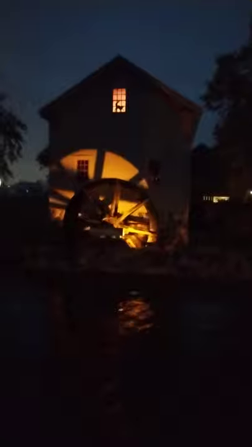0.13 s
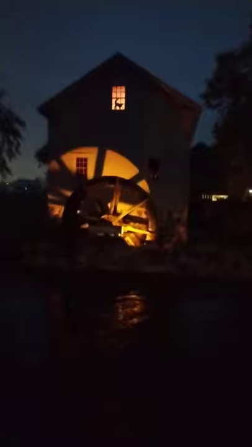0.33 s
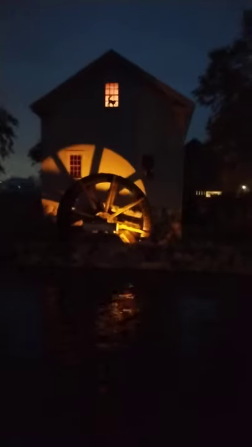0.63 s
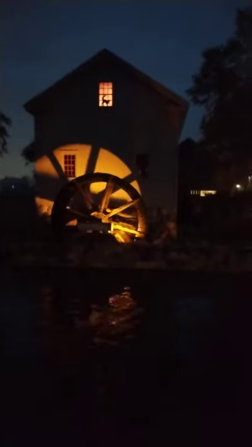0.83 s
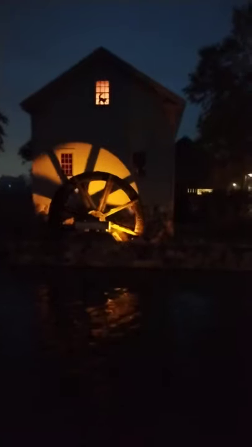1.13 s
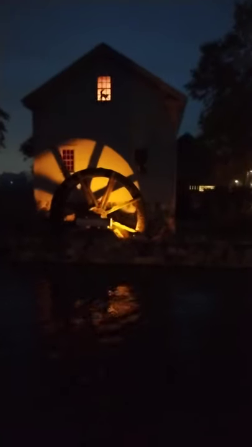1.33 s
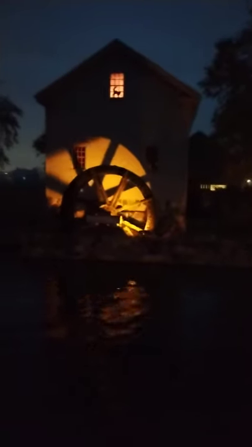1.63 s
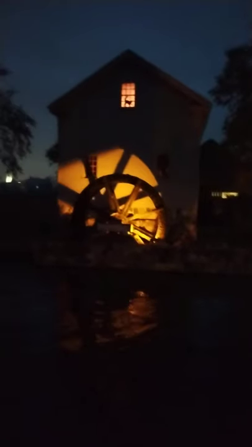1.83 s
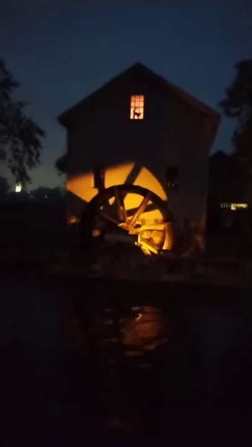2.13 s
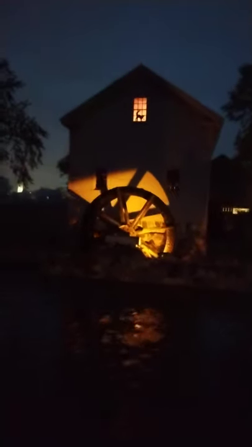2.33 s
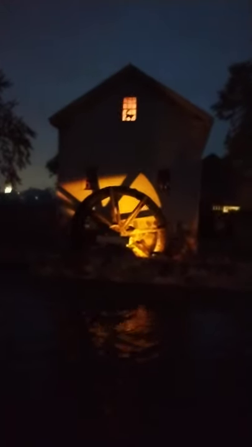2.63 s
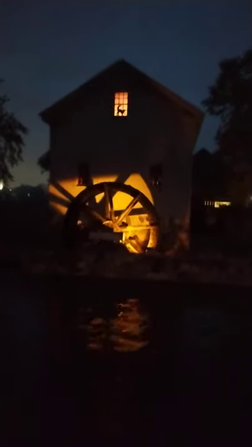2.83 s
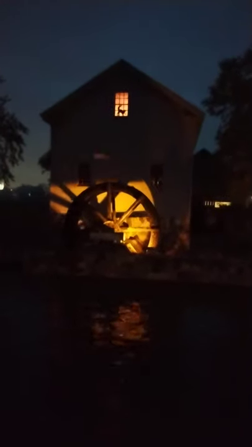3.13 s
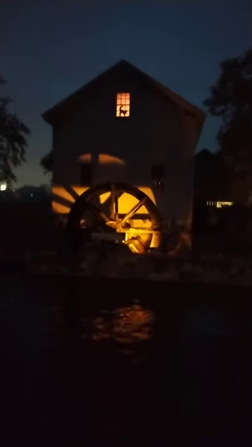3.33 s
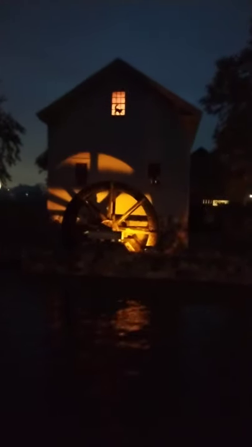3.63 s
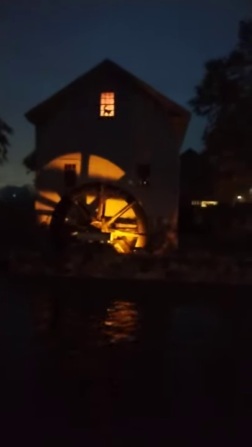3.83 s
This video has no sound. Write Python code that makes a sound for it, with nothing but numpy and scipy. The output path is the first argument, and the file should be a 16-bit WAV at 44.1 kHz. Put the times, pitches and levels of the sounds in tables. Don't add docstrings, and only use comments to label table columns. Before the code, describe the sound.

Rushing water at a mill wheel and weir, heard across a pond by a hand-held phone. Silence until 0.24 s, then a faint hiss swells to a full, steady roar by 0.5 s, with bright splashing spray and a low hollow boom. A deep plop sits near 0.7 s. From 2.1 to 3 s the flow weakens and wheel splashes thin out; a softer wash continues to 4 s, with tiny slaps near 2.6 and 3.8 s.

```python
import sys
import numpy as np
from scipy import signal
from scipy.fft import rfft, irfft
from scipy.io import wavfile

SR = 44100
rng = np.random.default_rng(int(sys.argv[2]) if len(sys.argv) > 2 else 0)


def bounce(signal):
    frames = np.transpose(np.atleast_2d(signal))
    limited = np.clip(frames, -1, 1)
    pcm = np.round(limited * 32767).astype(np.int16)
    wavfile.write(sys.argv[1], SR, pcm)


def voltage_ratio(level):
    return 10 ** (np.asarray(level, float) / 20)


N = 176400
OPENS_S, OPEN_RAMP_S = 0.2415, 0.0024


def table(rows, col, hz):
    rows = np.array(rows, float)
    return np.interp(np.log(hz + 1), np.log(rows[:, 0]), rows[:, col])


def walk(rate_hz):
    at = np.arange(N) * rate_hz / SR
    i = at.astype(int)
    part = at - i
    levels = rng.standard_normal(200)
    return 1.15 * (levels[i] + (levels[i + 1] - levels[i]) * part ** 2 * (3 - 2 * part))


def bursts(per_s, size_db):
    u = (2 * rng.random((2, N)) - 1) * SR / per_s
    born = abs(u) < 1
    size = (abs(u) + 1e-9) ** (-size_db * np.log(10) / 20)
    x = born * np.sign(u) * size
    return x / x.std()


def water(colour_db, ports, lo_hz, hi_hz, crowd, size_db, flicker_db, flicker_hz):
    hz = np.arange(N // 2 + 1) * SR / N
    thirds = 3 * np.log2(hz / lo_hz + 1e-9)
    parts = 0
    swell_db = 0.2 * walk(2.71)
    for k in range(int(3 * np.log2(hi_hz / lo_hz)) + 1):
        band = np.cos(np.pi / 2 * np.clip(thirds - k, -1, 1))
        per_s = min(crowd * lo_hz * 2 ** (k / 3), SR / 2)
        births = bursts(per_s, size_db)
        parts = parts + band * rfft(births * voltage_ratio(swell_db + flicker_db * walk(flicker_hz)))
    left, other = parts * voltage_ratio(colour_db(hz))
    like = np.clip(table(ports, 3, hz), 0, 1)
    shared = like * left * np.exp(-1j * table(ports, 2, hz))
    right = (shared + np.sqrt(1 - like ** 2) * other) * voltage_ratio(-table(ports, 1, hz))
    out = irfft(np.array([left, right]), N)
    return out / out[0].std()


def bump(hz, at_hz, width_hz, db):
    return db / (1 + (2 * (hz - at_hz) / width_hz) ** 2)


# frequency in Hz, density in dB per Hz.
ROAR_COLOUR = [(30, -30), (60, -10.5), (200, -4), (400, -6.5), (800, -13), (1400, -12), (2300, -23.5),
               (3400, -34)]
# frequency in Hz, left over right in dB, left lead in radians, likeness 0-1.
LOW_PORTS = [(150, .3, .1, .993), (430, 2.5, .3, .96), (740, -2.5, 0, .74), (950, -1, .6, .82),
             (1350, 3.5, 1.1, .66), (1850, 0, .35, .55), (2300, -1, 1.6, .3), (3000, 2, 2.7, .55)]


def roar():
    def colour_db(hz):
        return table(ROAR_COLOUR, 1, hz) + bump(hz, at_hz=2956, width_hz=590, db=6.5)
    return water(colour_db, LOW_PORTS, 25, 4200, crowd=2.5, size_db=2.0, flicker_db=0.5, flicker_hz=14)


# frequency in Hz, density in dB per Hz.
SPRAY_COLOUR = [(2500, -29), (4300, -12.5), (6800, -9), (7900, 1), (9600, -0.5), (12000, -13.5),
                (13500, -10), (15700, -11.5)]
# frequency in Hz, left over right in dB, left lead in radians, likeness 0-1.
HISS_PORTS = [(3000, 0.82, 6.1, 0.49), (4200, 2.9, 2.96, 0.69), (6550, 9.9, 6, 0.32), (8300, 15, 5.6, 0.56),
              (10000, 9.7, 5.9, 0.56), (11300, 0.83, 15, 0.27), (13000, 4.3, 3.6, .3), (16000, 3.8, 14, .3)]


def spray():
    return water(lambda hz: table(SPRAY_COLOUR, 1, hz), HISS_PORTS, 3250, 17000,
                 crowd=1.1, size_db=2.0, flicker_db=0.47, flicker_hz=15)


# frequency in Hz, density in dB per Hz.
SPILL_COLOUR = [(4800, -29), (6000, -7), (7200, -4), (8400, -0.5), (9600, -4), (11500, -23.5),
                (13500, -17.5), (15700, -17.5)]
# frequency in Hz, left over right in dB, left lead in radians, likeness 0-1.
WHEEL_PORTS = [(4480, 2.4, 3.1, 0.96), (6000, 7, 4, 1), (7200, 9.6, 3.9, 0.35), (8250, 15, 7.2, 0.31),
               (9600, 15, 4.3, 0.51), (10700, 4.6, 1.6, 0.56), (12000, 1, 2.6, .2), (14000, 5.5, 8, .2)]


def spill():
    return water(lambda hz: table(SPILL_COLOUR, 1, hz), WHEEL_PORTS, 4130, 17000,
                 crowd=0.99, size_db=1.5, flicker_db=1.3, flicker_hz=10.7)


# frequency in Hz, density in dB per Hz.
HOLLOW_COLOUR = [(50, -12), (75, -10.5), (100, -5), (120, 1), (140, -7), (180, -10.5), (260, -30)]


def hollow():
    return water(lambda hz: table(HOLLOW_COLOUR, 1, hz), LOW_PORTS, 60, 250,
                 crowd=3, size_db=1.0, flicker_db=-0.3, flicker_hz=7.2)


# frequency in Hz, density in dB per Hz.
STEADY_HISS_COLOUR = [(1800, -7), (3000, -2), (4300, 0), (5500, 1.5), (7000, 0), (9000, -1)]


def steady_hiss(t):
    level_db, settle_s = -57.5, 0.048
    hiss = water(lambda hz: table(STEADY_HISS_COLOUR, 1, hz), HISS_PORTS, 2460, 8500,
                 crowd=2.3, size_db=1.3, flicker_db=3.5, flicker_hz=5.5)
    since_open_s = np.clip(t - OPENS_S, 0, None)
    return hiss * voltage_ratio(level_db) * (1 - 0.2 * np.exp(-since_open_s / settle_s))


# start in seconds, pitch in Hz, level in dB, length in seconds.
PLOP_EVENTS = [
    (0.6925, 139, -28, 0.0057),
    (2.64, 2055, -49.5, 0.01),
    (3.76, 1650, -46, 0.0078),
]


def plops(t):
    out = np.zeros(N)
    for start_s, hz, db, length_s in PLOP_EVENTS:
        u = np.clip(t - start_s, 0, None) / length_s
        swell = np.e * u * np.exp(-u)
        out += voltage_ratio(db) * swell * np.sin(2 * np.pi * hz * length_s * u)
    return out


# time in seconds, then roar, spray, spill and hollow in dB.
FLOW_LEVELS = [(.24, -49, -51.5, -64, -55), (.3, -40.5, -46.5, -55, -52), (.36, -37, -42, -45, -51),
               (.5, -33.5, -40.5, -41, -41), (.9, -33.5, -44.5, -40.5, -38),
               (1.2, -33.5, -49, -39.5, -43.5), (1.5, -33.5, -50, -39.5, -39.5),
               (1.8, -34, -50, -40.5, -36.5), (2.07, -33.5, -57, -40, -40), (2.16, -35.5, -49, -43.5, -40),
               (2.45, -37.5, -47.5, -45, -51), (2.7, -40, -45.5, -49, -42.5), (3.0, -42, -45.5, -69, -46),
               (3.37, -41, -46.5, -68, -46.5), (3.42, -42, -50.5, -70, -49.5),
               (3.75, -41, -51.5, -68, -41.5), (4, -41.5, -53.5, -61, -49)]


def scene():
    t = np.arange(N) / SR
    flow = np.array(FLOW_LEVELS)
    mix = np.zeros((2, N))
    for k, layer in enumerate((roar(), spray(), spill(), hollow())):
        mix += layer * voltage_ratio(np.interp(t, flow[:, 0], flow[:, k + 1]))
    return mix + plops(t) + steady_hiss(t)


def top_cut(x):
    return signal.sosfilt(signal.butter(12, 16410, fs=SR, output="sos"), x)


def record(dry):
    gate = np.clip((np.arange(N) / SR - OPENS_S) / OPEN_RAMP_S, 0, 1)
    low_pass = signal.ellip(12, 0.2, 70, 15715, fs=SR, output="sos")
    return top_cut(signal.sosfilt(low_pass, dry * gate))


dry = scene()
out = record(dry)
bounce(out)
```